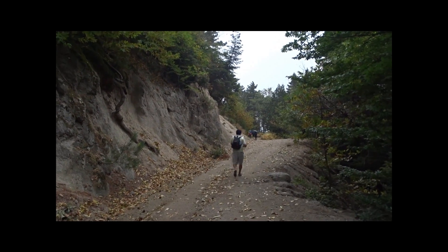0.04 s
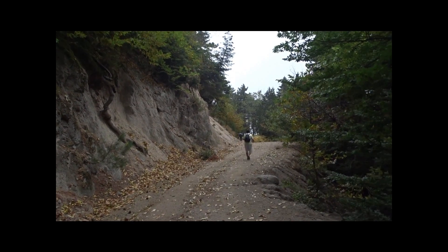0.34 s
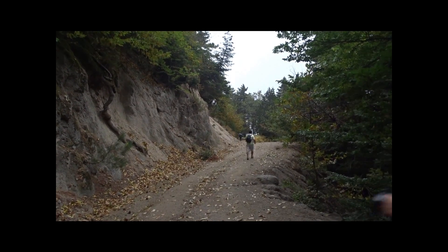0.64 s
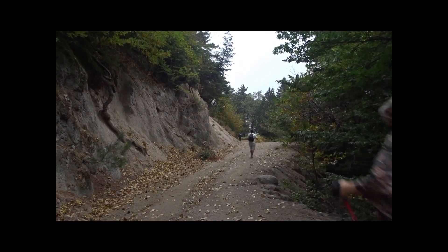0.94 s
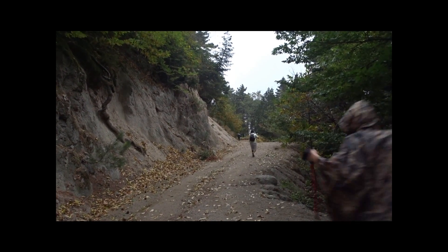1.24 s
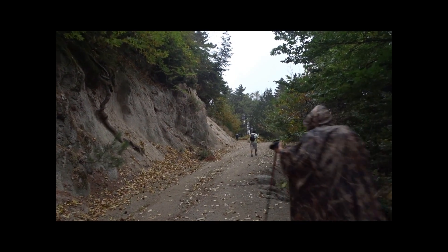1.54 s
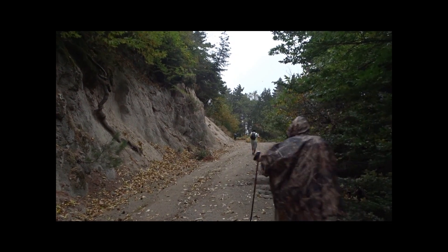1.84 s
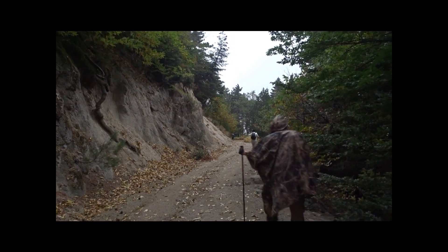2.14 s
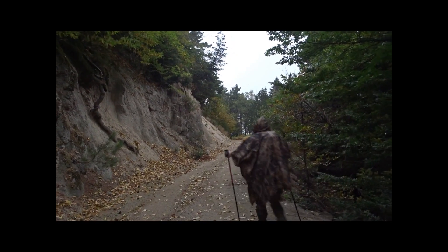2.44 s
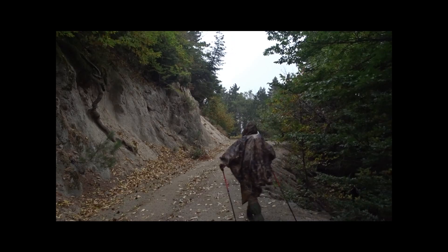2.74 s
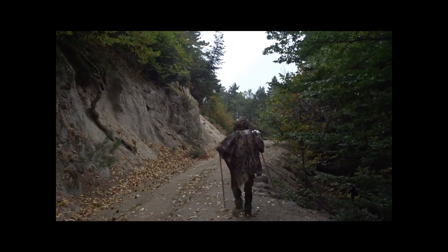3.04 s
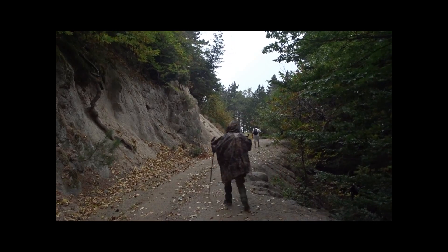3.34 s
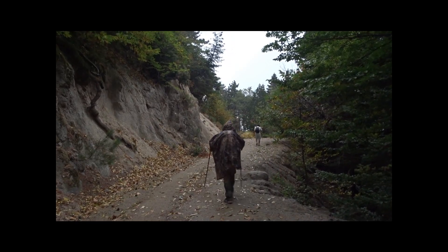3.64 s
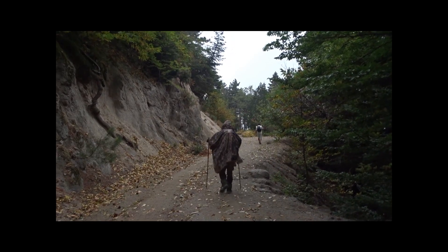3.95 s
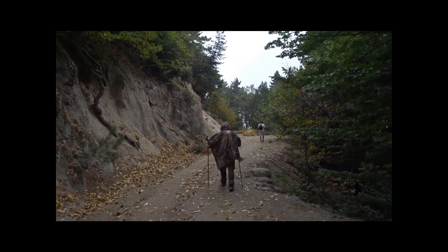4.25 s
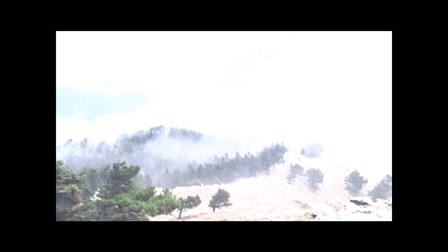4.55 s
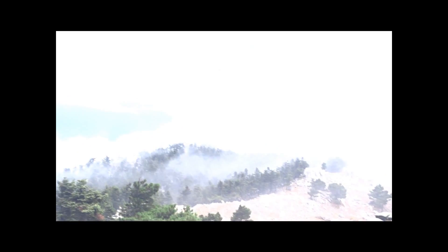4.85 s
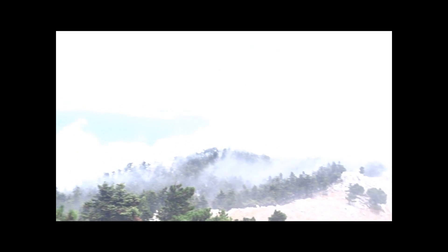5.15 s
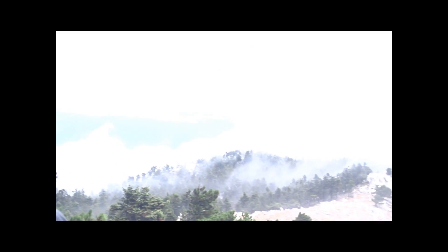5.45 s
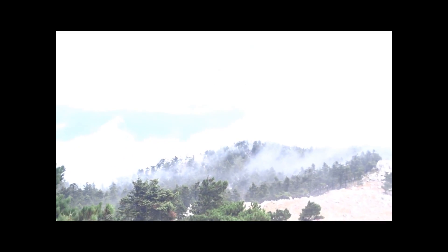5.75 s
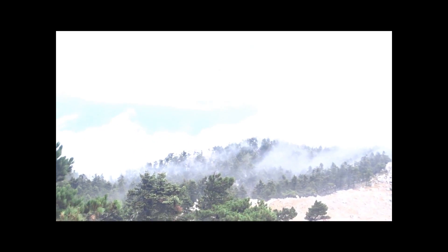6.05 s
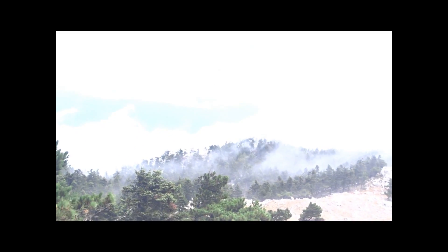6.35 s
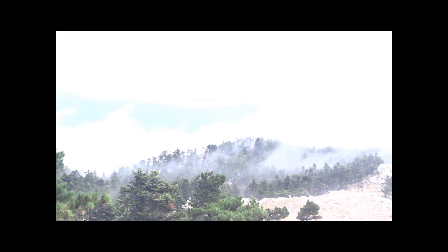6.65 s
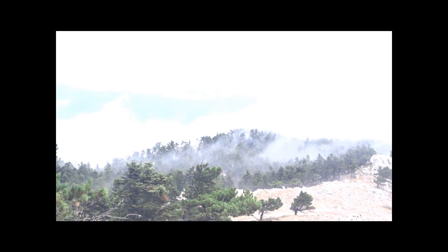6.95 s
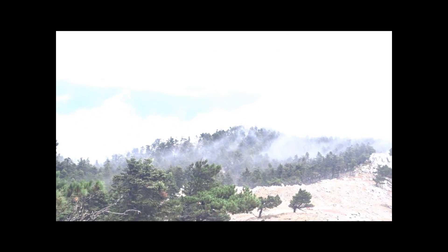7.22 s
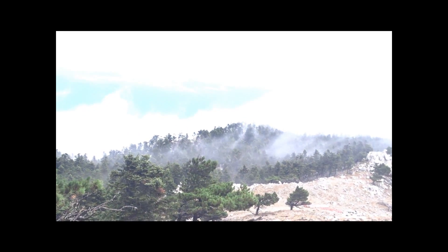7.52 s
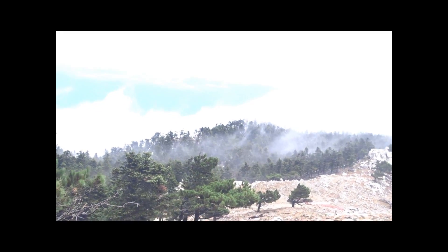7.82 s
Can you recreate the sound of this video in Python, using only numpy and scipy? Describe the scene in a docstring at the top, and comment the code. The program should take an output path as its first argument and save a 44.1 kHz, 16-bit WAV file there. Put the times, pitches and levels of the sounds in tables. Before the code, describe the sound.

After a short burst of close raindrops, soft even rain fills a forest, with a few nearby drips and gentle bumps of air on the microphone. A hiker passes with swishing rain gear, light crunches on gravel and one hollow pole knock. A little past halfway the sound cuts to a hillside, where strong, uneven wind hits the microphone with a deep rumble and rasping hiss, almost hiding one thin chirp.

```python
"""A burst of close rain spatters first. After a short silence, steady rain hisses in the trees along a
forest track: single drops tap close by, a walker's poncho swishes, a pole knocks once, grit crunches
underfoot, and a breeze flutters on the two microphone ports. After another short silence, strong gusts
on an open hillside buffet the ports: large eddies rumble, smaller ones roar, the smallest crackle and
hiss. One thin chirp and the faint hiss of far trees lie behind the wind."""
import sys
import numpy as np
from scipy import signal
from scipy.fft import rfft, irfft
from scipy.io import wavfile
from scipy.ndimage import uniform_filter1d, minimum_filter1d

SR = 44100
rng = np.random.default_rng(int(sys.argv[2]) if len(sys.argv) > 2 else 0)


def int16_out(signal):
    """Quantize to a 16-bit WAV file."""
    q = np.round(np.clip(np.atleast_2d(signal).T, -1, 1) * 32767)
    wavfile.write(sys.argv[1], SR, q.astype(np.int16))


N = 347508
T, HZ = np.arange(N) / SR, np.arange(N // 2 + 1) * SR / N

# hillside wind strength: time_s, strength_db
WIND = [(4.65, 5), (4.78, -4), (4.86, 3.5), (4.95, -9), (4.99, 3.5), (5.11, -1.5), (5.26, -4), (5.36, -10),
        (5.42, -12.5), (5.48, -3), (5.55, -10.5), (5.66, -9), (5.84, -4.5), (6.06, -4.5), (6.15, 5.5),
        (6.25, 2), (6.40, -3.5), (6.52, 3), (6.58, 6.5), (6.7, 3), (6.78, 5.5), (6.845, 11.5), (6.895, 5),
        (6.908, -10), (6.975, -3.5), (7.03, 0), (7.17, 1), (7.24, 6.5), (7.38, 5.5), (7.5, 4), (7.66, 4),
        (7.73, 8.5), (7.86, 7)]
# sharp gusts on top of it: centre_s, rise_db, length_s
GUSTS = [(4.645, 4, 0.0046), (4.868, 6.5, 0.028), (4.942, 11, 0.0043), (4.986, 4.5, .004),
         (5.138, 8, 0.013), (5.206, 9.5, .005), (5.26, 8, 0.003), (5.431, 12, .008), (5.576, 17, 0.028),
         (5.641, 4, .003), (5.776, 8.5, 0.0061), (5.822, 0, .004), (5.862, 4.5, .0035), (5.905, 11, 0.0081),
         (5.976, 10, .011), (6.425, 8, 0.0061), (6.628, 8, 0.0071), (7.07, 4, 0.004), (7.1, 6, .004),
         (7.303, 6, 0.0032), (7.405, 7, 0.0067), (7.735, -0.5, .01)]
# flow letting go of the ports: centre_s, change_db, length_s
LULLS = [(4.91, -2, 0.033), (5.17, -10, 0.0074), (5.315, 4, 0.016), (5.508, -11, 0.018),
         (5.63, -5.5, 0.016), (5.807, -22, 0.0036), (5.843, -18, 0.0026), (5.877, -4, 0.005),
         (5.933, -7, 0.0041), (6.455, -12, 0.013), (6.525, -8, .008), (6.922, -5, 0.0075),
         (7.052, -3, .008)]
def hill_wind():
    """One gusty flow, chopped by eddies, drives both the buffeting and the hiss at the ports."""
    wind_db = curves(WIND)[0] + swings(GUSTS)
    lull_db = swings(LULLS)
    eddies = jolts(rate_per_s=65, decay_s=.014)
    return buffeting(wind_db, lull_db, eddies) + eddy_hiss(wind_db, lull_db, eddies)


# buffeting spectrum: freq_hz, density_db
BUFFET_SPECTRUM = [(13, -48), (22, -25), (59, -8), (119, -5.5), (331, -2.5), (867, -9.5), (1140, -13.5),
                   (1700, -30), (2210, -59), (3740, -120)]
# big eddies thumping the ports or leaving them slack: centre_s, change_db, length_s
SURGES = [(4.81, 7, .009), (5.315, -8, 0.03), (5.43, 6, 0.0083), (5.575, 13, 0.01), (5.78, 9, 0.0041),
          (6.04, -4.5, 0.014), (6.33, -5, 0.042), (6.49, -10, .012), (6.63, -2, .009), (6.675, 4, 0.012),
          (6.735, 7.5, 0.018), (7.05, 2.5, .04), (7.17, 4, .012), (7.275, -5, 0.0064), (7.505, 4, 0.014)]
# swells and slumps of the low roar: centre_s, change_db, length_s
ROAR_SWINGS = [(4.912, -7, .008), (5.085, 2, 0.0097), (5.62, -3.5, 0.028), (5.70, 3, .018),
               (6.015, -2.5, 0.011), (6.125, 3.5, 0.016), (6.455, -2, 0.011), (6.835, 3.5, 0.017),
               (7.025, -1.5, 0.0098)]
def buffeting(wind_db, lull_db, eddies):
    """Large eddies rumble on both ports at once; smaller ones roar on each in turn."""
    surge_db = swings(SURGES)
    pressure = ports(colour(noise(), BUFFET_SPECTRUM, band_hz=(250, 1300)), HILL_PORTS)
    deep, roar = split(pressure, hz=192)
    waver_db = .38 * walk(1.66) + 1.1 * walk(30)
    rumble = unit(deep) * undb(-31 + .054 * wind_db + .13 * lull_db + surge_db + waver_db)
    # the roar brightens in a gust and dulls in a lull
    body, edge = split(roar, hz=765)
    body_db = .064 * wind_db + .3 * lull_db + .15 * surge_db + swings(ROAR_SWINGS) + .36 * walk(45)
    edge_db = .42 * wind_db + lull_db + 1.5 * eddies
    return rumble + undb(-28.5 + 1.06 * eddies) * (body * undb(body_db) + edge * undb(edge_db))


# small-eddy spectrum: freq_hz, density_db
HISS_SPECTRUM = [(900, 0), (1500, 3), (2100, 4), (3200, -1), (4500, -7), (6000, -13), (8000, -17.5),
                 (9500, -23.5), (11000, -32)]
def eddy_hiss(wind_db, lull_db, eddies):
    """The smallest eddies tear past as crackling hiss; higher bands follow the wind more steeply."""
    rasp = noise() + .7 * patter(rate_per_s=1600, spread_db=2.2)
    hiss = ports(colour(rasp, HISS_SPECTRUM, band_hz=(2500, 10000)), HILL_PORTS)
    coarse, treble = split(hiss, hz=3620)
    fine, finest = split(treble, hz=6160)
    chop_depth_db = 3.5 * np.exp(-.05 * wind_db)  # slack wind is choppier
    chop_db = chop_depth_db * eddies + 2 * jolts(rate_per_s=140, decay_s=.005)
    speed_db = wind_db + lull_db + np.minimum(chop_db, 5)
    return (coarse * undb(-49.5 + .6 * speed_db)
            + fine * undb(-50.5 + 1.14 * speed_db)
            + finest * undb(-50 + 1.29 * speed_db))


# close drops and one pole knock (the two rows at 1.22 s): start_s, attack_db, knock_db, pitch_hz
IMPACTS = [(0.012, -20, -19, 860), (.046, -24, -17, 870), (0.072, -18, -20, 900), (.104, -24, -22, 880),
           (.119, -12, -24, 900), (0.155, -15, -26, 860), (0.161, -17, -24, 810), (.167, -17, -26, 864),
           (0.191, -21, -24, 800), (0.215, -29, -31, 900), (1.17, -24, -21, 1300), (1.218, -32, -20, 460),
           (1.2205, -27, -25, 850), (1.3888, -18, -24, 900), (1.807, -33, -23, 860), (2.048, -31, -25, 860),
           (3.54, -33, -21, 950), (3.6277, -24, -26, 2000), (4.0799, -24, -16, 980),
           (4.2891, -42, -14, 835), (4.557, -41, -23, 880)]
# modes of what is struck: pitch_ratio, t60_s, level_db
IMPACT_MODES = [(.4, 0.028, -10), (1, 0.0075, 6), (1.4, 0.012, 1), (1.92, 0.004, -7), (2.67, .003, -9),
                (3.4, .009, -11)]
def drops_and_pole_knock():
    """Close drops and one hollow knock of a walking pole: each a sharp attack and a brief ring."""
    out, t = np.zeros((2, N)), T[:2048]
    ratio, t60_s, mode_db = np.transpose(IMPACT_MODES)[:, :, None]
    for start_s, attack_db, knock_db, pitch_hz in IMPACTS:
        mode_hz = pitch_hz * ratio * np.exp(.04 * rng.standard_normal(ratio.shape))
        knock = np.sum(undb(mode_db - 60 * t / t60_s) * np.cos(2 * np.pi * mode_hz * t), axis=0)
        fizz = rng.standard_normal((3, len(t))) * np.exp(-t / .0013)  # shared, left, right
        click = np.exp(-t / .0001) * np.cos(2 * np.pi * 3500 * t)
        attack = .2 * (fizz[0] + .4 * fizz[1:]) + click
        i = int(start_s * SR)
        out[:, i:i + len(t)] += undb(knock_db) * knock / np.abs(knock).max() + undb(attack_db) * attack
    # the drops and the knock carry nothing below about 300 Hz
    return signal.sosfilt(signal.butter(2, 300, "high", fs=SR, output="sos"), out)


# close rain spectrum: freq_hz, density_db
SHOWER_SPECTRUM = [(24, -42), (40, -6), (98, 0.5), (450, -11.5), (483, -13), (597, -10.5), (1720, -8),
                   (1890, -9), (6560, -15), (11000, -21.5), (14300, -51), (22000, -120)]
def shower():
    """Close rain: a dense spatter of impacts with a little hiss between them."""
    spatter = patter(rate_per_s=5000, spread_db=3.3) + undb(-4) * noise()
    return undb(-36) * ports(colour(spatter, SHOWER_SPECTRUM, band_hz=(400, 11000)), FOREST_PORTS)


# spectrum of rain in the trees: freq_hz, density_db
FOREST_SPECTRUM = [(30, -4), (100, -5), (170, -5), (280, -1.5), (600, -0.5), (820, 1), (1100, 0),
                   (1600, -0.5), (3000, -2.5), (4600, -3.5), (7300, -4), (8300, -9), (10300, -8.5),
                   (11100, -16.5)]
def forest_rain(start_s, fade_db=10, fade_s=.1, ease_db_per_s=.5):
    """Far drops merge into hiss, nearer ones tick on leaves; the rain fades in, then slowly eases."""
    age_s = np.maximum(T - start_s, 0)
    rain_db = -39.5 - ease_db_per_s * age_s - fade_db * np.exp(-age_s / fade_s)
    leaves = patter(rate_per_s=1500, spread_db=2.5) * undb(-2.5 + walk(14))
    wash = noise() * undb(.25 * walk(9))
    return undb(rain_db) * ports(colour(wash + leaves, FOREST_SPECTRUM, (600, 6000)), FOREST_PORTS)


# poncho swishes: centre_s, level_db, length_s
SWISHES = [(.51, -36, 0.012), (.61, -38, 0.052), (.745, -36.5, 0.02), (.792, -39, .0063),
           (.88, -43.5, .051), (1.22, -43, .008), (1.71, -39.5, 0.011), (1.94, -47, .025),
           (2.222, -40, 0.008), (2.55, -40.5, 0.0099), (3.865, -41, 0.013)]
# wet fabric spectrum: freq_hz, density_db
PONCHO_SPECTRUM = [(800, -37), (2500, -8), (5000, 3), (7300, 7.5), (9500, 8), (11000, 3)]
def poncho():
    """Wet fabric slides and crinkles as the walker's poles swing."""
    crinkle = noise() + patter(rate_per_s=4000, spread_db=3)
    return swells(SWISHES) * ports(colour(crinkle, PONCHO_SPECTRUM), FOREST_PORTS)


# boots and poles on gravel: centre_s, level_db, length_s, low_hz, high_hz
STEPS = [(0.401, -39.5, 0.019, 1500, 7400), (1.219, -38.5, 0.0035, 300, 563),
         (1.218, -38, .0035, 900, 1440), (1.254, -37, 0.0031, 700, 1400), (1.394, -41, 0.008, 700, 3500),
         (1.809, -36, 0.0032, 1700, 2400), (1.93, -37.5, 0.011, 1000, 5000), (2.222, -36, .005, 3960, 6500),
         (3.575, -44, 0.021, 1100, 2000), (3.628, -38, 0.0033, 1300, 4000)]
def footsteps():
    """Grit crunches under boots and poles in bursts of tiny impacts."""
    grit = ports(patter(rate_per_s=7000, spread_db=2.5), FOREST_PORTS)
    return sum(burst(grit, *step) for step in STEPS)


# light air on the ports: time_s, level_db
BREEZE = [(0.31, -61), (0.44, -48), (.66, -61), (.8, -42), (1.03, -60), (1.25, -57), (1.43, -54),
          (1.64, -56), (1.8, -48), (2.2, -58), (2.28, -58), (2.9, -61), (3.35, -57), (3.75, -52.5),
          (4.1, -67), (4.55, -71)]
# its spectrum: freq_hz, density_db
BREEZE_SPECTRUM = [(20, -5), (50, 1.5), (110, 0), (190, -10.5), (300, -15), (600, -38), (1500, -66)]
# single eddies bumping the ports: centre_s, level_db, length_s, low_hz, high_hz
BUMPS = [(0.038, -32, 0.0047, 41, 253), (0.333, -39.5, .0078, 41, 200), (0.37, -36.5, 0.012, 55, 260),
         (0.74, -34.5, 0.0092, 41, 334), (0.828, -34, .005, 60, 169), (0.876, -34, 0.007, 41, 170),
         (0.904, -38.5, 0.0049, 200, 420), (0.93, -38.5, 0.0066, 60, 260), (1.366, -39, 0.0083, 50, 170),
         (1.462, -39.5, 0.015, 41, 300), (1.565, -43.5, 0.0095, 60, 330), (1.736, -38.5, 0.0093, 65, 190),
         (2.128, -43, 0.012, 30, 130), (2.174, -41, 0.017, 50, 264), (2.34, -45, 0.012, 130, 380),
         (2.402, -35.5, 0.013, 130, 298), (2.407, -42, 0.0073, 330, 600), (2.725, -29, 0.0042, 84, 165),
         (3.237, -46, 0.022, 30, 100), (3.315, -41, 0.018, 25, 192), (4.257, -40, 0.0018, 90, 420),
         (4.433, -51, 0.0091, 90, 220)]
def breeze(wake_db=-21, wake_stretch=3.6):
    """Light air flutters on the ports; a stronger eddy thuds and stirs the air around it."""
    wake = swells([(centre_s, db + wake_db, wake_stretch * length_s)
                   for centre_s, db, length_s, *_ in BUMPS])
    envelope = np.hypot(undb(curves(BREEZE)[0]), wake) * undb(1.6 * walk(24.75))
    flutter = envelope * ports(colour(noise(), BREEZE_SPECTRUM), FOREST_PORTS)
    air = ports(noise(), FOREST_PORTS)
    return flutter + sum(burst(air, *bump) for bump in BUMPS)


def chirp(centre_s=4.799, level_db=-50.5, length_s=.013, pitch_hz=8300, glide_hz_per_s=-10000):
    """A thin, very high, rough chirp that falls in pitch."""
    offset_s = np.clip(T - centre_s, -3 * length_s, 3 * length_s)
    rough_hz = (pitch_hz + glide_hz_per_s * offset_s) * (1 + .045 * walk(1500))
    return undb(level_db) * bell(centre_s, length_s) * np.sin(2 * np.pi * np.cumsum(rough_hz) / SR)


# spectrum of wind in far trees: freq_hz, density_db
TREES_SPECTRUM = [(900, 3), (3000, 2.5), (5500, -6), (7500, -5), (9500, -8.5), (11000, -16)]
def far_trees():
    """Far trees hiss faintly and steadily in the wind."""
    return undb(-62.5) * ports(colour(noise(), TREES_SPECTRUM, band_hz=(2500, 10000)), FOREST_PORTS)


# port pair in rain and among trees: freq_hz, coherence, left_lead_rad, left_minus_right_db
FOREST_PORTS = [(60, 0.75, 0, -0.5), (170, 0.6, 0.11, -0.5), (600, 0.81, 0.07, -0.5),
                (1500, 0.79, -0.047, -2.5), (6600, 0.82, 0.022, -1), (10000, 0.52, -.2, -1.2)]
# port pair in strong wind: freq_hz, coherence, left_lead_rad, left_minus_right_db
HILL_PORTS = [(60, .96, 0, 2.5), (130, .8, .2, 4.3), (220, .15, .9, 5.5), (290, .4, 3.2, 2.5),
              (480, .69, 3.6, .6), (1100, .88, 4, 1), (2100, .65, 4.2, -.5), (3400, .53, 4.8, 0),
              (7000, .7, 5.9, 1), (11000, .5, 6, 3.5)]
def ports(pair, table):
    """Two unrelated sounds become left and right, partly alike; their mean keeps its level."""
    coherence, lead_rad, tilt_db = over_hz(table)
    coherence, lean = np.clip(coherence, 0, .99), undb(tilt_db / 2)
    left, other = rfft(pair)
    right = coherence * np.exp(-1j * lead_rad) * left + np.sqrt(1 - coherence ** 2) * other
    mid_gain = np.sqrt(lean ** 2 + lean ** -2 + 2 * coherence * np.cos(lead_rad)) / 2
    return irfft(np.array([left * lean, right / lean]) / mid_gain, N)


def undb(db):
    """Decibels to gain."""
    return 10 ** (np.asarray(db) / 20)


def unit(x):
    """Scale to rms 1."""
    return x / np.sqrt(np.mean(x ** 2))


def curves(table):
    """Each column of a time table, sample by sample."""
    time_s, *columns = np.transpose(table)
    return [np.interp(T, time_s, column) for column in columns]


def over_hz(table):
    """Each column of a frequency table, joined on a log axis."""
    hz, *columns = np.transpose(table)
    return [np.interp(np.log(HZ + 1), np.log(hz), column) for column in columns]


def colour(x, spectrum, band_hz=(0, SR)):
    """Give white sound a spectrum; rms 1 inside the band."""
    gain = undb(over_hz(spectrum)[0])
    inside = (HZ >= band_hz[0]) & (HZ < band_hz[1])
    return irfft(rfft(unit(x)) * gain / np.sqrt(np.mean(gain ** 2 * inside)), N)


def split(x, hz):
    """The parts below and above a frequency."""
    low, spectrum = 1 / (1 + (HZ / hz) ** 6), rfft(x)
    return irfft(spectrum * low, N), irfft(spectrum * (1 - low), N)


def noise():
    """Two unrelated white noises."""
    return rng.standard_normal((2, N))


def patter(rate_per_s, spread_db):
    """Two streams of tiny impacts, most small and a few large."""
    size = undb(spread_db * np.minimum(rng.exponential(size=(2, N)), 5))
    hits = rng.random((2, N)) < rate_per_s / SR
    return unit(hits * size * np.sign(noise()))


def walk(rate_hz):
    """Random held levels, smoothed twice; rms 1."""
    hold = max(int(SR / rate_hz), 2)
    held = np.repeat(rng.standard_normal(N // 20)[:N // hold + 1], hold)[:N]
    return unit(uniform_filter1d(uniform_filter1d(held, hold), hold))


def jolts(rate_per_s, decay_s):
    """Each new eddy takes over suddenly with its own strength and dies away; rms 1."""
    arrives, strength = rng.random(N) < rate_per_s / SR, .5 + rng.random(N)
    latest = np.maximum.accumulate(np.arange(N) * arrives)
    level = strength[latest] * np.exp(-(T - T[latest]) / decay_s)
    return unit(level - level.mean())


def bell(centre_s, length_s):
    """Gaussian swell, peak 1; length_s is its standard deviation."""
    return np.exp(-.5 * ((T - centre_s) / length_s) ** 2)


def swells(table):
    """Bell-shaped swells, summed as gain."""
    return sum(undb(db) * bell(centre_s, length_s) for centre_s, db, length_s in table)


def swings(table, skew=.3):
    """Skewed bells, summed in dB; the level rises faster than it falls."""
    return sum(db * bell(centre_s, length_s * np.exp(skew * np.sign(db * (T - centre_s))))
               for centre_s, db, length_s in table)


def burst(source, centre_s, level_db, length_s, low_hz, high_hz):
    """A short bell-shaped burst of one band of a sound."""
    out, near = np.zeros((2, N)), np.abs(T - centre_s) < .2
    shape = bell(centre_s, length_s)[near]
    bandpass = signal.butter(3, [low_hz, high_hz], "band", fs=SR, output="sos")
    band = shape * signal.sosfilt(bandpass, source[:, near])
    out[:, near] = undb(level_db) * band * np.sqrt(np.mean(shape ** 2) / np.mean(band ** 2))
    return out


def during(start_s, end_s):
    """Gate: 1 inside the span, then a faint short tail."""
    tail = undb(-24 - 950 * np.maximum(T - end_s, 0))
    return uniform_filter1d((T >= start_s) * np.where(T < end_s, 1, tail), size=16)


def scene():
    """Close rain, forest track and hillside in turn, with short silences between."""
    track_start_s = .296
    near = breeze() + drops_and_pole_knock()
    opening = during(0, .231) * (shower() + near)
    track = during(track_start_s, 4.567) * (forest_rain(track_start_s) + poncho() + footsteps() + near)
    hill = during(4.634, 7.9) * (hill_wind() + far_trees() + chirp())
    return opening + track + hill


def record(dry):
    """A fast limiter holds the strongest peaks down; the top is cut steeply."""
    ceiling_db, top_hz = -11.5, 11050
    allowed_gain = np.minimum(1, undb(ceiling_db) / (np.abs(dry).max(axis=0) + 1e-9))
    gain = uniform_filter1d(minimum_filter1d(allowed_gain, size=500), size=500)
    return signal.sosfilt(signal.ellip(12, .2, 70, top_hz, fs=SR, output="sos"), dry * gain)


dry = scene()
out = record(dry)
int16_out(out)
```